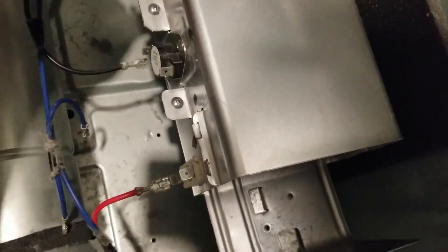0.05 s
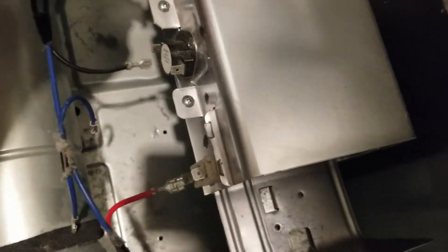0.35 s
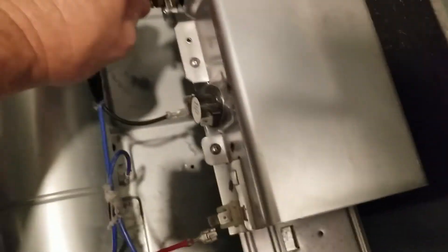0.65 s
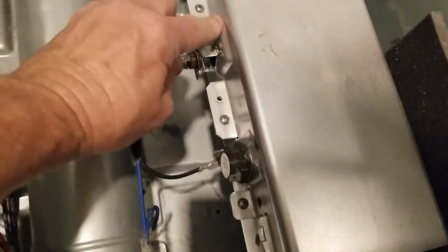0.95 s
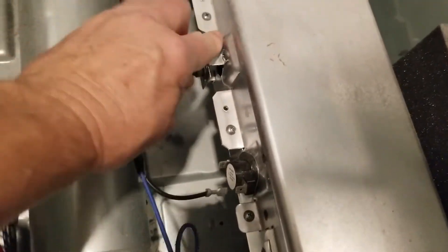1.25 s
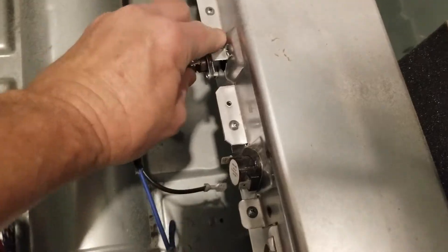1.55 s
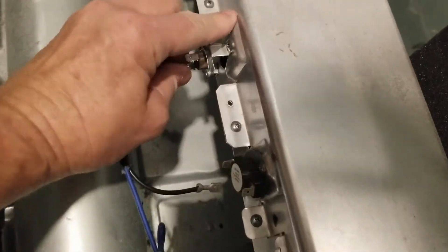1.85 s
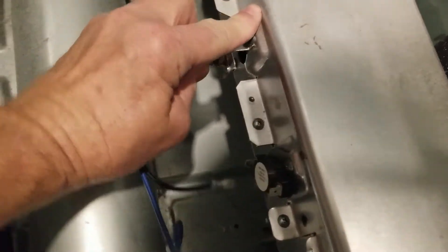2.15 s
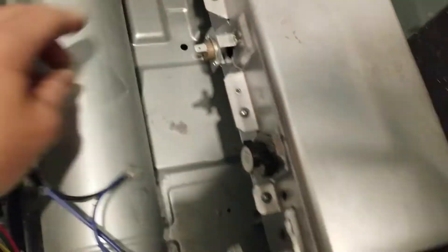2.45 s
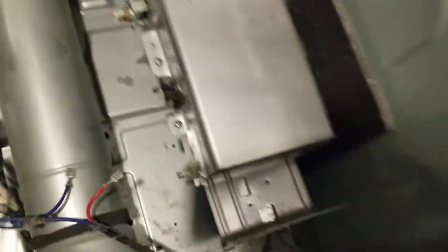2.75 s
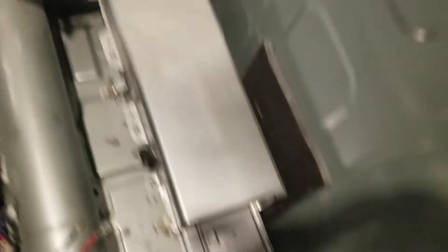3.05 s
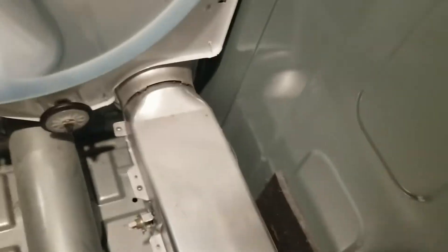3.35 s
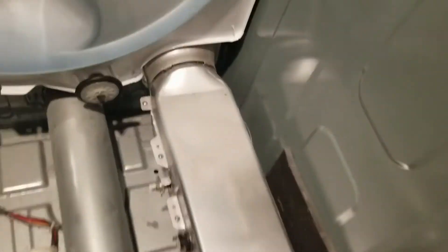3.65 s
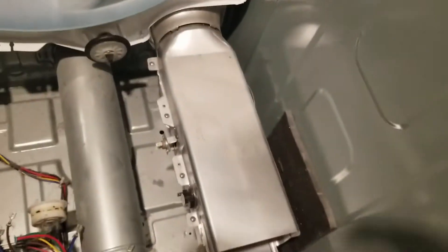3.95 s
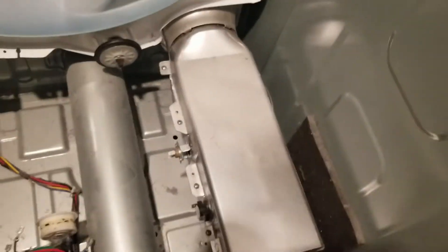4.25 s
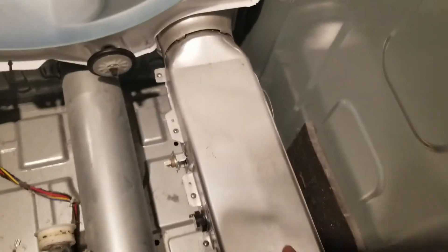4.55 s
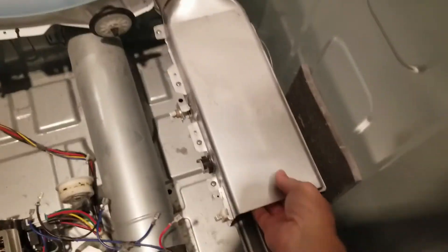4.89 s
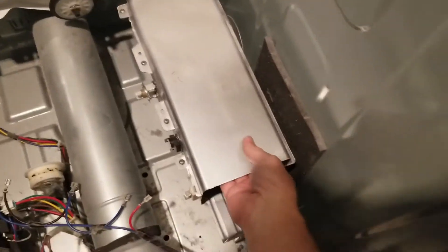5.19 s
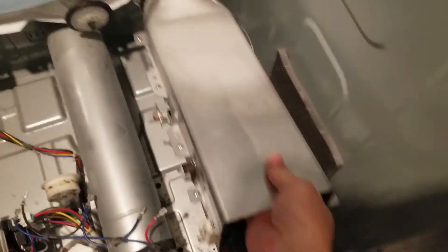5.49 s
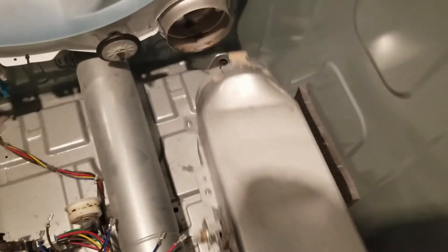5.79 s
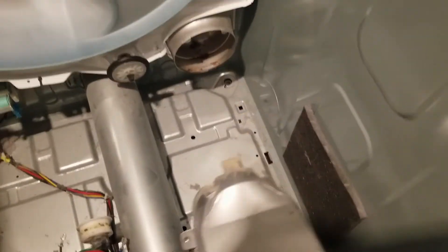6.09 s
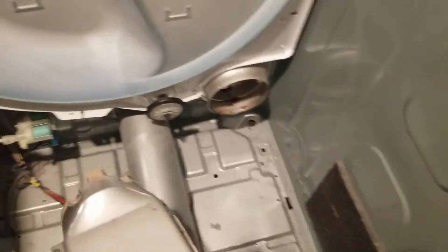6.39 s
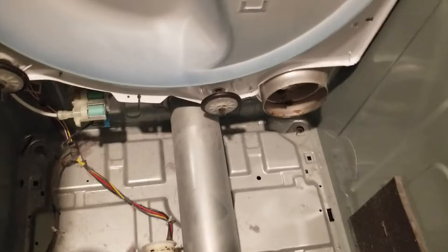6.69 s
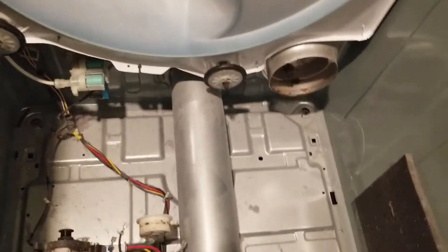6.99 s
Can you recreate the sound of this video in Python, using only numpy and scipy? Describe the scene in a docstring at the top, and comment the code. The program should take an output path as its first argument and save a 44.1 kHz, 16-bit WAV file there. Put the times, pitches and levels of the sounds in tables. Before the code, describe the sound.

Close, irregular clanks and scrapes of thin steel ring briefly in an appliance cabinet as a hand works connectors off a duct. Midway, the hand-held microphone picks up finger rubbing and sharp clicks, then a short lull. Cloth rustles, the duct comes loose with a loud hollow clatter, and it rasps lightly against an edge while being lifted out. The sound leans left.

```python
"""Pulling a dryer's heater duct.

A hand works wire connectors off the sheet-metal duct, then pulls it free and lifts it out.
Contacts clank and scrape in the duct's modes, thin panels boom, and the cabinet rings on.
A sleeve rustles close by. Fingers shift on a hand-held camera: they rub and knock at its left
microphone, crack its case and briefly cover its ports."""
import sys
import numpy as np
from scipy import signal
from scipy.fft import rfft, irfft
from scipy.io import wavfile
from scipy.ndimage import uniform_filter1d

SR = 44100
rng = np.random.default_rng(int(sys.argv[2]) if len(sys.argv) > 2 else 0)


def unload_audio(sound):
    """Save the sound as a 16-bit wav file, at the path given as the first command line argument."""
    columns = np.transpose(np.atleast_2d(sound))
    # keep every value between -1 and 1, then stretch to whole-number steps
    steps = np.round(np.clip(columns, -1, 1) * 32767)
    wavfile.write(sys.argv[1], SR, steps.astype(np.int16))


N = 310023
TIME_S, BINS_HZ = np.arange(N) / SR, np.fft.rfftfreq(N, 1 / SR)

PORT_COHERENCE = [(100, 1), (300, 0.71), (650, .75), (1400, 0.07), (3000, 0.14)]  # likeness of the two microphone ports: f/Hz, coherence/1
RIGHT_SHADE = [(60, -11), (380, -9.5), (700, -13), (2400, -13.5), (6500, -12.5), (9500, 1), (15000, 2)]  # shaded right port against the left: f/Hz, level/dB
ROOM_SPECTRUM = [(18, -34.5), (30, 2.5), (118, 1), (273, -18.5), (336, -14), (666, -9), (1130, -23.5),
                 (1590, -26), (2290, -22.5), (9220, -33), (12600, -35.5), (16000, -37)]  # room air: f/Hz, level/dB
PORT_COVER = [(3.9, 3.5), (4.05, -4.5), (4.2, -17.5), (4.45, -21.5), (4.62, -8.5), (7.03, 1)]  # room air as a finger covers the ports: t/s, level/dB
SQUEEZE_STROKES = [(0, 0.22, -41), (0.34, 0.23, -43), (0.996, 0.41, -52), (1.798, 0.34, -53),
                   (3.545, 0.1, -46), (3.844, 0.048, -30), (3.96, 0.11, -49), (4.55, 0.8, -46.5),
                   (5.9, 1.45, -54.5)]  # hand tightening on the camera: t/s, length/s, level/dB
GRIP_SPECTRUM = [(20, -7.5), (45, 0), (100, 2), (200, -4.5), (400, -13), (700, -9), (1200, -15),
                 (3000, -30), (8000, -59)]  # rumble through the case: f/Hz, level/dB
DRAG_STROKES = [(-.02, 0.026, -40.5), (0.084, 0.09, -51.5), (0.235, 0.056, -39), (0.388, 0.081, -43),
                (0.49, 0.063, -36.5), (1.06, .07, -43), (1.277, .08, -47), (1.42, 0.017, -38),
                (1.477, 0.056, -40.5), (1.585, 0.023, -41.5), (1.836, 0.084, -47), (1.967, 0.034, -58),
                (2.4, 0.081, -48.5), (2.452, 0.26, -38.5), (2.786, 0.037, -43), (2.868, 0.072, -37)]  # connectors and wire over metal: t/s, length/s, level/dB
DRAG_SPECTRUM = [(100, 3), (400, -6.5), (1200, 2), (3000, 4.5), (6000, 3), (8300, -12), (11000, -5.5),
                 (16000, -23.5)]  # connector friction: f/Hz, level/dB

# metal on metal: t/s, contact length/s, level/dB, body/dB, hardness/dB (last two re middle band)
BLOWS = [(.091, 0.04, -30.5, 12.5, -14.5), (0.239, .022, -16.5, 2.5, -22), (.399, 0.013, -20.5, 8.5, -11.5),
         (0.426, 0.0053, -16.5, 1, -7.5), (.496, 0.03, -27.5, 9.5, -7.5), (0.584, 0.0041, -38.5, 25, -11.5),
         (.987, 0.0067, -18.5, 16, -7.5), (1.034, 0.0031, -20.5, 11, -4), (1.155, .008, 3, -4.5, -8.5),
         (1.234, 0.0046, -23, 14.5, -4), (1.376, 0.0038, -19.5, 6, -3), (1.604, .018, -26.5, 4, -5.5),
         (2.171, 0.0071, -17, 12.5, -10), (2.205, 0.015, -6, 3.5, 1.5), (2.352, 0.0099, -18, -3, -0.5),
         (2.521, 0.0033, -33, -13, 10), (2.55, 0.0123, -22.5, -2, 1.5), (2.651, 0.0079, -31, 7, 2),
         (2.741, 0.06, -33.5, 15.5, -1), (2.821, 0.0045, -26.5, 13, 6.5), (5.278, 0.028, -10, 7, -16.5),
         (5.302, 0.011, 0, 4.5, -13.5), (5.328, 0.023, -3.5, 0.5, -14), (5.388, 0.016, 1.5, 6, -8),
         (5.415, 0.0023, -6.5, 4.5, -7)]
BLOW_BANDS_HZ = [150, 700, 1800, 5000, 12000]  # boom, body, middle, edge, sparkle: f/Hz
CONTACT_SPECTRUM = [(25, -15.5), (60, -3), (120, 3.5), (220, -4), (380, -5.5), (620, -3), (1000, -3.5),
                    (1600, 0), (4200, 1.5), (7000, 3), (8300, -7.5), (10000, 3), (16000, 3)]  # metal contact: f/Hz, level/dB
DUCT_MODES = [(280, -24, 0.2), (444.8, -15.5, 0.25), (490.4, -21, 0.38), (588, -24, 0.93),
              (682, -17.5, 0.37), (756.6, -21, 0.47), (959, -26, 0.62), (1336, -18, 0.22),
              (1434, -13.5, 0.11), (1556, -13, 0.24), (1604, -12.5, 0.088), (1642, -20.5, 0.22),
              (1737, -20, 0.34), (1840, -17.5, 0.14), (2000, -12.5, 0.2), (2150, -16.5, 0.32),
              (2317, -11.5, 0.25), (2850, -16.5, 0.28), (3170, -17.5, 0.17), (3110, -17.5, 0.18),
              (3820, -14.5, 0.16), (4100, -17, 0.16), (4070, -15, 0.096), (5140, -16.5, 0.1)]  # main duct modes: f/Hz, level/dB, t60/s
SHEET_DECAY = [(100, 0.44), (700, 0.33), (1800, 0.24), (5000, 0.17), (12000, 0.12)]  # dense ringing of the sheet: f/Hz, t60/s
CABINET_DECAY = [(100, 1.0), (700, 0.89), (1800, 1), (5000, 0.44), (12000, .5)]  # cabinet ringing: f/Hz, t60/s
CABINET_SPECTRUM = [(100, -7), (700, -14.5), (1800, -21.5), (5000, -18.5), (12000, -24.5)]  # cabinet against sheet: f/Hz, level/dB
TAB_RINGS = [(0.256, 1410, 250, -41, 0.2), (0.424, 2510, 300, -25, 0.17), (.425, 5100, 400, -29, 0.16),
             (1.127, 4560, 3100, -34.5, 0.19), (1.157, 1545, 302, -10, 0.14), (1.156, 3050, 500, -11, 0.14),
             (1.378, 6420, 900, -20, 0.074), (1.385, 2840, 400, -30, 0.22), (1.488, 3030, 200, -35, 0.093),
             (1.611, 3050, 251, -36.5, 0.074), (2.215, 3900, 1000, -13, 0.1), (2.525, 2170, 150, -37, 0.34)]  # tabs and connectors ringing: t/s, f/Hz, width/Hz, level/dB, t60/s

CASE_KNOCKS = [(.584, -20.5, 450, -10), (0.595, -21.5, 382, -20), (0.7958, -18, 756, 46),
               (3.616, -18.5, 3020, 6), (3.824, -8, 1470, 21), (3.870, -0.5, 705, 29),
               (3.9371, -11, 576, 39), (3.9538, -13.5, 2000, 37), (4.123, -33.5, 700, 30),
               (4.18, -36.5, 595, 28), (4.3361, -32.5, 448, 37), (4.5177, -38.5, 710, 30),
               (4.745, -22, 2200, 28), (4.9819, -11.5, 1940, 39), (5.233, -20.5, 616, 41),
               (5.4864, -8.5, 3500, 24), (5.9902, -33.5, 443, 30), (6.079, -11.5, 1780, 40),
               (6.0904, -26.5, 590, 29), (6.5425, -15, 675, 43), (6.7925, -20.5, 1100, 37)]  # grip knocking the case: t/s, peak/dB, corner/Hz, left-right/dB
PANEL_FLEXES = [(.987, 643, -12.5, 0.0023, 0.1), (.987, 751, -17, 0.0015, 0.22),
                (0.988, 108, -32.5, 0.0096, 0.75), (2.171, 588.5, -16, 0.0029, 0.15),
                (2.171, 672, -22.5, 0.0032, 0.25), (2.191, 104.5, -42, 0.037, 0.39),
                (2.761, 81.6, -38, 0.13, 1.53), (5.306, 110.5, -15.5, 0.062, 0.28),
                (5.38, 124.7, -21, 0.03, 0.15), (5.40, 154.3, -24.5, 0.023, 0.72)]  # whole panels popping: t/s, f/Hz, peak/dB, rise/s, t60/s
FINGER_STROKES = [(3.491, 0.034, -27.5, 0), (3.558, 0.075, -30, -1), (3.679, 0.038, -29, 1.5),
                  (3.727, 0.053, -36.5, 5.5), (3.825, 0.038, -24.5, 0), (3.908, 0.0069, -16.5, -4),
                  (3.96, 0.084, -42.5, -17), (4.206, 0.023, -46, -27)]  # finger by the microphone: t/s, length/s, level/dB, treble/dB
SKIN_SPECTRUM = [(35, -32.5), (70, -18.5), (240, -5), (430, 2), (900, -6.5), (1400, -10), (2000, -8.5),
                 (3000, -5), (4500, -5.5), (6700, -11.5), (8200, -25), (11300, -15.5), (16000, -27)]  # skin friction: f/Hz, level/dB
CASE_CRACKS = [(3.495, -27, 3500, -25), (3.6835, -32, 4000, -13), (3.8235, -15, 5250, -16),
               (3.8695, -4.5, 2970, -18), (3.8903, -13, 3450, -3), (3.9148, -9, 3200, -17),
               (3.9186, -10.5, 2900, -13), (3.9239, -14.5, 3000, 3)]  # squeezed case cracking: t/s, level/dB, f/Hz, fizz/dB
SLEEVE_STROKES = [(3.958, 0.36, -78.5, -3), (4.515, 0.24, -54.5, -9), (4.72, 0.089, -52, -1.5),
                  (4.851, 0.043, -48, -2.5), (4.88, 0.23, -52.5, 5), (5.138, 0.071, -44, -2.5),
                  (5.21, 0.14, -44.5, -3), (5.614, 0.23, -55, -10), (5.83, 0.32, -61, -24.5),
                  (6.173, 0.14, -58, -10.5), (6.274, 0.4, -55.5, 4.5), (6.66, 0.12, -46, 0),
                  (6.794, 0.18, -51, -0.5), (6.97, .07, -43.5, -8)]  # arm reaching and lifting: t/s, length/s, level/dB, treble/dB
CLOTH_SPECTRUM = [(120, -20.5), (200, -16.5), (500, -9.5), (850, -5), (1200, -8.5), (1750, 0), (2750, -8),
                  (4000, -8.5), (6200, -13.5), (8400, -33), (9800, -26.5), (12800, -29), (16000, -41)]  # cloth friction: f/Hz, level/dB
RASP_STROKES = [(6.652, 0.13, -36.5), (6.945, 0.036, -37.5)]  # lifted duct against an edge: t/s, length/s, level/dB
RASP_SPECTRUM = [(300, -31), (700, -8), (1100, -9), (1450, 5), (2100, 2.5), (3200, -5.5), (5000, -22),
                 (8200, -25), (10500, -16.5), (16000, -29)]  # thin steel sliding: f/Hz, level/dB


def amp(db):
    """Decibels to gain."""
    return 10 ** (np.asarray(db) / 20)


def unit(x):
    """Scale to rms 1."""
    return x / np.sqrt(np.mean(x ** 2) + 1e-20)


def read(points, hz):
    """Interpolate on a log-frequency axis."""
    points_hz, values = np.transpose(points)
    return np.interp(np.log(hz + 1), np.log(points_hz + 1), values)


def colour(x, spectrum):
    """Filter a full-length sound by a spectrum in dB."""
    return irfft(rfft(x) * amp(read(spectrum, BINS_HZ)), N)


def add(mix, start_s, sound):
    """Mix in a stereo sound."""
    part = mix[:, max(round(start_s * SR), 0):][:, :sound.shape[1]]
    part += sound[:, :part.shape[1]]


def port_noise(size):
    """White noise at two ports: alike in the bass, nearly unrelated in the treble."""
    left, other = rfft(rng.standard_normal((2, size)))
    coherence = np.clip(read(PORT_COHERENCE, np.fft.rfftfreq(size, 1 / SR)), 0, 1)
    right = coherence * left + np.sqrt(1 - coherence ** 2) * other
    return irfft(np.array([left, right]), size)


def band(hz, width_hz, size):
    """Stereo noise in one resonance, rms 1."""
    detuning = (np.fft.rfftfreq(size, 1 / SR) - hz) / (width_hz / 2)
    return unit(irfft(rfft(port_noise(size)) / (1 + detuning ** 2), size))


def burst(hz, width_hz, length_s, size):
    """Gaussian puff of band noise, centred in its buffer."""
    envelope = np.exp(-((np.arange(size) - size // 2) / SR / length_s) ** 2)
    return unit(band(hz, width_hz, size)[0] * envelope) * np.sqrt(np.mean(envelope ** 2))


def resonances(depth_db, spacing_hz, bins_hz=BINS_HZ):
    """Gain of many close resonances: random peaks and valleys, shallow in the bass."""
    grid_hz = np.arange(0, SR, spacing_hz)
    gain = amp(depth_db * np.clip(rng.standard_normal(len(grid_hz)), -2, 1.5))
    return np.interp(bins_hz, grid_hz, unit(gain)) ** np.minimum(bins_hz / 700, 1)


def friction(grain_db, slip_samples):
    """Noise whose strength jumps from slip to slip."""
    slips = unit(uniform_filter1d(rng.standard_normal(N), slip_samples))
    return unit(port_noise(N) * amp(grain_db * slips))


def stroke(start_s, length_s, db, rise_s, t60_s):
    """Gain of one slide: gathers speed, holds, dies away."""
    age_s = TIME_S - start_s
    fall_db = np.minimum(60 * np.maximum(age_s - length_s, 0) / t60_s, 200)
    return np.clip(age_s / rise_s, 0, 1) * amp(db - fall_db)


def power_sum(gains):
    """Overlapping movements add in power."""
    return np.sqrt(sum(gain ** 2 for gain in gains))


def brush(noise, strokes, corner_hz):
    """Shape noise by strokes (gain curve, treble/dB above the corner)."""
    dull = irfft(rfft(noise) / (1 + (BINS_HZ / corner_hz) ** 6), N)
    dull_gain = power_sum(gain for gain, _ in strokes)
    treble_gain = power_sum(gain * amp(db) for gain, db in strokes)
    return dull * dull_gain + (noise - dull) * treble_gain


def room(level_db=-60):
    """Quiet air; dips while a finger covers the ports."""
    cover_db = np.interp(TIME_S, *np.transpose(PORT_COVER))
    return unit(colour(port_noise(N), ROOM_SPECTRUM)) * amp(level_db + cover_db)


def grip(right_db=-7, rest_db=-68):
    """The hand rumbles through the case, swelling with each squeeze."""
    swells = power_sum(stroke(start_s, length_s, db, rise_s=0.25 * length_s, t60_s=4.7 * length_s)
                       for start_s, length_s, db in SQUEEZE_STROKES)
    rumble = unit(colour(friction(grain_db=4, slip_samples=700), GRIP_SPECTRUM))
    return rumble * np.hypot(swells, amp(rest_db)) * amp([[0], [right_db]])


def connector_drags(gain_db=-2, ring_db=-7.5, half_width_hz=22, contact_points=3):
    """Fine slips excite the duct's modes, differently at each contact point."""
    peaks = sum(1 / (1 + ((BINS_HZ - hz) / half_width_hz) ** 2) for hz, _, _ in DUCT_MODES)
    slips = rfft(friction(grain_db=1.5, slip_samples=120)) * amp(read(DRAG_SPECTRUM, BINS_HZ))
    ringing = slips * (1 + amp(ring_db) * peaks)
    out = np.zeros((2, N))
    for k in range(contact_points):
        scrape = unit(irfft(ringing * resonances(depth_db=4.5, spacing_hz=77.2), N))
        rows = DRAG_STROKES[k::contact_points]
        out += scrape * power_sum(stroke(*row, rise_s=0.022, t60_s=0.2) for row in rows)
    return amp(gain_db) * out


def dense_ring(contact_s, size):
    """Crowded modes: held during contact, dying fast in the sheet and slowly in the cabinet."""
    hz, frames_s, frames = signal.stft(port_noise(size), SR, nperseg=256)
    hz, age_s = hz[:, None], np.maximum(frames_s - contact_s, 0)
    sheet = amp(-60 * age_s / read(SHEET_DECAY, hz))
    cabinet = amp(read(CABINET_SPECTRUM, hz) - 60 * age_s / read(CABINET_DECAY, hz))
    return signal.istft(frames * np.hypot(sheet, cabinet), SR, nperseg=256)[1][:, :size]


def duct_ring(contact_s, size, gain_db=-8):
    """Main duct modes, each met at a random phase."""
    t, out = np.arange(size) / SR, np.zeros((2, size))
    for hz, db, t60_s in DUCT_MODES:
        envelope = amp(gain_db + db - 60 * np.maximum(t - contact_s, 0) / t60_s)
        mode = envelope * np.sin(2 * np.pi * (hz * t + rng.random()))
        right_polarity = np.sign(read(PORT_COHERENCE, hz) + rng.uniform(-0.87, 1))
        out += [mode, mode * right_polarity]
    return out


def blow_spectrum(contact_s, body_db, hard_db):
    """Long pushes move more panel and boom; hard edges sparkle. Rows: f/Hz, level/dB."""
    boom_db = body_db - 7.5 + 3 * np.log2(contact_s / 0.01)
    sparkle_db = -9.5 + 1.66 * hard_db
    return list(zip(BLOW_BANDS_HZ, [boom_db, body_db, 0, hard_db, sparkle_db]))


def clanks(gain_db=-1, dip_db=-0.5, dip_s=0.017, size=49152):
    """Metal on metal: energy builds during contact, then rings out."""
    out, t = np.zeros((2, N)), np.arange(SR) / SR
    bins_hz = np.fft.rfftfreq(size, 1 / SR)
    for start_s, contact_s, db, body_db, hard_db in BLOWS:
        dense = rfft(dense_ring(contact_s, size))
        dense *= resonances(depth_db=4, spacing_hz=60, bins_hz=bins_hz)  # varies by contact point
        modes = rfft(duct_ring(contact_s, size // 2), size)
        tone_db = read(blow_spectrum(contact_s, body_db, hard_db), bins_hz)
        tone_db += read(CONTACT_SPECTRUM, bins_hz)
        ring = irfft((dense + modes) * amp(gain_db + db + tone_db), size)[:, :SR]
        build = np.minimum(t / contact_s, 1) ** 0.76
        release_dip = amp(dip_db * (np.exp(-abs(t - contact_s) / dip_s) - 0.5))
        add(out, start_s, ring * build * release_dip)
    return out


def clinks(rise_s=0.0012, size=16384):
    """Small parts ring in clusters of close modes."""
    out, t = np.zeros((2, N)), np.arange(size) / SR
    for start_s, hz, width_hz, db, t60_s in TAB_RINGS:
        envelope = np.minimum(t / rise_s, 1) * amp(db - 60 * t / t60_s)
        add(out, start_s, band(hz, width_hz, size) * envelope)
    return out


def settling_slips(from_s=4.55, to_s=5.9, peak_db=-33.5, spread_db=6.5, count=4):
    """Faint random slips of the settling hand, as CASE_KNOCKS rows."""
    slot_s, corner_hz, pan_db = (to_s - from_s) / count, 550, 27.5
    return [(from_s + slot_s * (k + when), peak_db + spread_db * (2 * force - 1), corner_hz, pan_db)
            for k, (when, force) in enumerate(rng.random((count, 2)))]


def knocks(highpass_hz=110, thud_gain=0.55, thud_hz=450, size=2048):
    """Each slip of the grip is a pressure spike with a dull rebound."""
    out, spike = np.zeros((2, N)), signal.unit_impulse(size)
    thud = signal.lfilter(*signal.butter(2, thud_hz, fs=SR), spike)
    highpass = signal.butter(2, highpass_hz, "high", fs=SR)
    for start_s, db, corner_hz, pan_db in CASE_KNOCKS + settling_slips():
        snap = signal.lfilter(*signal.butter(3, corner_hz, fs=SR), spike)
        pulse = signal.lfilter(*highpass, snap / snap.max() + thud_gain * thud / thud.max())
        pan = amp([[min(pan_db, 0)], [min(-pan_db, 0)]])
        add(out, start_s, pan * amp(db) * pulse / abs(pulse).max())
    return out


def panel_booms():
    """Whole panels flex and pop: sines that swell and decay."""
    out, t = np.zeros((2, N)), np.arange(SR) / SR
    for start_s, hz, db, rise_s, t60_s in PANEL_FLEXES:
        swell = np.minimum(t / rise_s, 1) * amp(db - 60 * np.maximum(t - rise_s, 0) / t60_s)
        add(out, start_s, np.tile(swell * np.sin(2 * np.pi * hz * t), (2, 1)))
    return out


def finger_rubs(right_db=-17.5):
    """Skin slides by the left port; shorter slides start and stop more abruptly."""
    slips = rfft(colour(friction(grain_db=3, slip_samples=150), SKIN_SPECTRUM))
    skin = unit(irfft(slips * resonances(depth_db=3.5, spacing_hz=110), N))
    strokes = [(stroke(start_s, length_s, db, rise_s=0.25 * length_s, t60_s=4.6 * length_s), treble_db)
               for start_s, length_s, db, treble_db in FINGER_STROKES]
    return brush(skin, strokes, corner_hz=1008) * amp([[0], [right_db]])


def cracks(right_db=-37, length_s=0.00096, hollow_db=-8, size=2048):
    """The squeezed case snaps at the left port, with a fizzy top and a brief hollow note."""
    out = np.zeros((2, N))
    for start_s, db, hz, fizz_db in CASE_CRACKS:
        fizz = amp(fizz_db) * burst(hz=13500, width_hz=4700, length_s=length_s, size=size)
        hollow = amp(hollow_db) * burst(hz=940, width_hz=180, length_s=0.002, size=size)
        snap = burst(hz, width_hz=2600, length_s=length_s, size=size)
        add(out, start_s - size // 2 / SR, (snap + fizz + hollow) * amp([[db], [db + right_db]]))
    return out


def sleeve(gain_db=7.5, right_db=-10.5, drift_hz=1.3, positions=4):
    """Cloth hiss whose reflections shift as the arm moves."""
    slips = rfft(friction(grain_db=1.84, slip_samples=300)) * amp(read(CLOTH_SPECTRUM, BINS_HZ))
    cloth = np.zeros((2, N))
    for k in range(positions):
        crossfade = np.maximum(np.cos(2 * np.pi * (drift_hz * TIME_S + k / positions)), 0) ** 2
        cloth += crossfade * irfft(slips * resonances(depth_db=7, spacing_hz=69.2), N)
    strokes = [(stroke(start_s, length_s, db, rise_s=0.45 * length_s, t60_s=0.42), treble_db)
               for start_s, length_s, db, treble_db in SLEEVE_STROKES]
    return brush(unit(cloth), strokes, corner_hz=2800) * amp(gain_db) * amp([[0], [right_db]])


def duct_rasp(right_db=-9):
    """Thin steel slides grittily against an edge."""
    slips = rfft(colour(friction(grain_db=0.5, slip_samples=150), RASP_SPECTRUM))
    scrape = unit(irfft(slips * resonances(depth_db=8.5, spacing_hz=80), N))
    envelope = power_sum(stroke(*row, rise_s=0.034, t60_s=0.45) for row in RASP_STROKES)
    return scrape * envelope * amp([[0], [right_db]])


def scene():
    """The right port is shaded; knocks and cracks bypass the shading through the case."""
    metal = clanks() + panel_booms() + clinks() + connector_drags() + duct_rasp()
    left, right = metal + sleeve() + finger_rubs() + grip() + room()
    return np.array([left, colour(right, RIGHT_SHADE)]) + knocks() + cracks()


def record(dry, cutoff_hz=16100):
    """Overload at full scale, then band limit."""
    lowpass = signal.firwin(255, cutoff_hz, window=("kaiser", 8), fs=SR)
    return signal.oaconvolve(np.clip(dry, -1, 1), lowpass[None], "same")


dry = scene()
out = record(dry)
unload_audio(out)
```